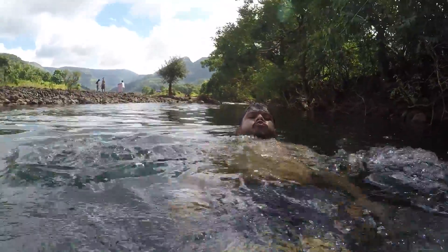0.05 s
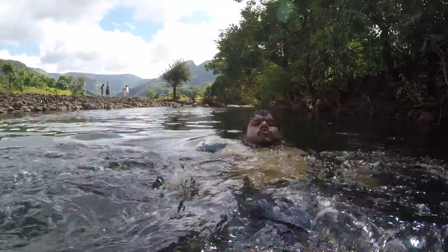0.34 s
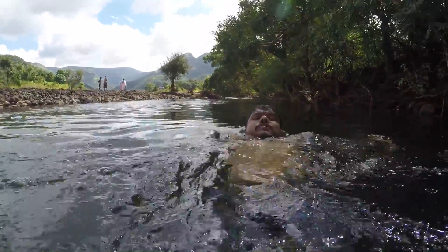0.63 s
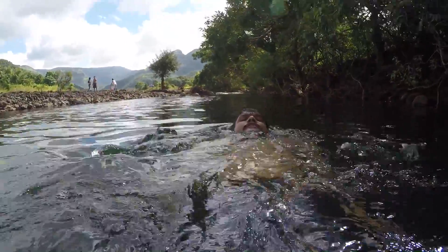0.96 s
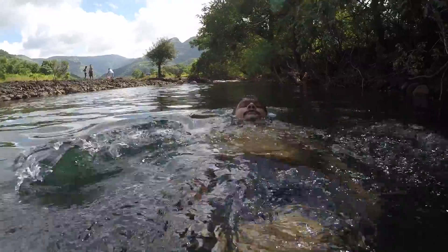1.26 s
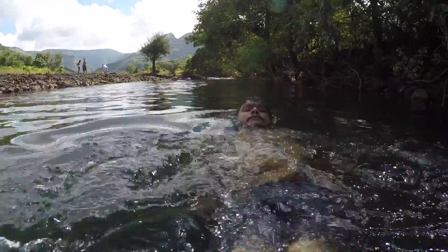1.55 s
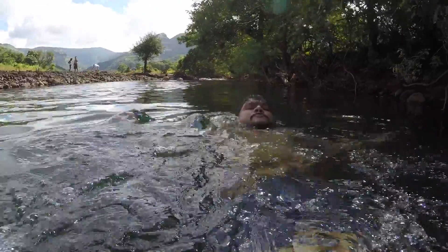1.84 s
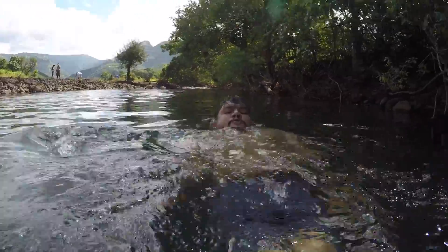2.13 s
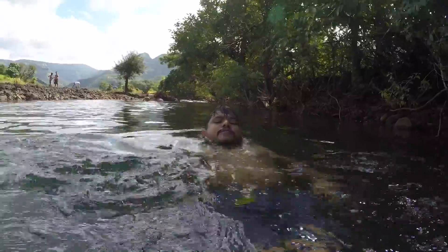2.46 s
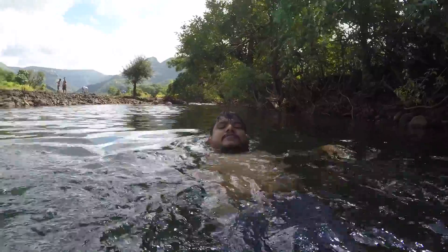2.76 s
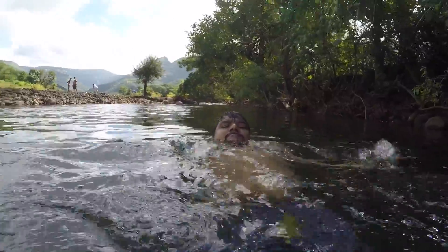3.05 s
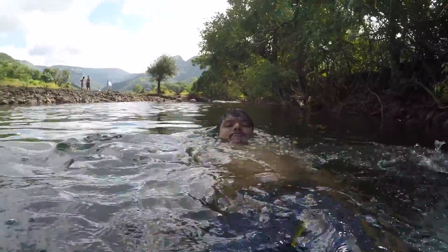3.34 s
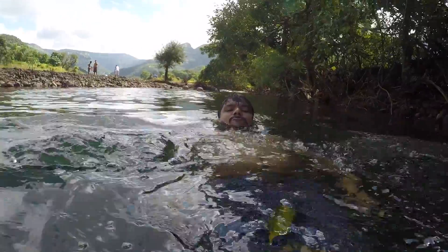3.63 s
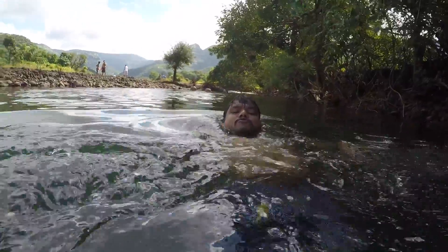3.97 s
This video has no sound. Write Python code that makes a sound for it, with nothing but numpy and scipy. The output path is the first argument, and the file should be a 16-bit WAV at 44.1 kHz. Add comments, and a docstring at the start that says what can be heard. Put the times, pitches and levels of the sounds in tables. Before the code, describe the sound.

Water splashes and sloshes as a swimmer paddles close by in a river.

```python
"""In a calm river, a swimmer paddles close to a camera whose waterproof case gives the splashes a boxy
ring near 2 kHz. Each stroke stirs up gurgling bubbles, pattering drops and fine spray. Slaps on the water
trap pockets of air that plop, and single drops land with a click and a chirp. Underneath, water trickles,
river and air hiss steadily, and wind on the microphone rumbles softly."""
import sys
import numpy as np
from scipy import signal
from scipy.fft import rfft, irfft, next_fast_len
from scipy.io import wavfile

SR = 44100
rng = np.random.default_rng(int(sys.argv[2]) if len(sys.argv) > 2 else 0)


def output_pcm(signal):
    """Save a mono or channel-first signal as 16-bit PCM at the path in sys.argv[1].

    Samples are clipped to [-1, 1] before scaling.
    """
    pcm = np.clip(np.atleast_2d(signal).T, -1, 1) * 32767
    wavfile.write(sys.argv[1], SR, np.round(pcm).astype(np.int16))


N = 176400

# How the waterproof case shapes the splashes. Each row: frequency in Hz, boost or cut in dB.
CASE_TONE = [(150, -24), (300, -8.5), (500, -8.5), (640, -5.5), (850, -4), (1170, -1.5), (1340, -12.5),
             (1570, -2.5), (1900, 1.5), (2240, 0.5), (2700, -4), (3400, -18.5), (4080, -13), (4500, -12),
             (4950, -14.5), (5450, -11.5), (5900, -21), (8200, -24), (9000, -27), (10500, -28.5),
             (12500, -30), (15000, -32.5)]


def undb(db):
    """Turn decibels into a number to multiply by."""
    return 10 ** (np.asarray(db) / 20)


def unit(x):
    """Scale a sound so that its average level (rms) is 1."""
    return x / np.sqrt(np.mean(x ** 2))


def peak(x):
    """Scale a sound so that its peak is 1."""
    return x / np.abs(x).max()


def add(out, start_s, x):
    """Mix the sound x into out, starting at a given time."""
    i = max(int(start_s * SR), 0)
    out[i:i + len(x)] += x[:max(len(out) - i, 0)]


def colour(x, points):
    """Shape the tone of a sound along a curve of (Hz, dB) points."""
    size = 2 * next_fast_len(len(x))
    hz, db = np.array(points, float).T
    bin_hz = np.arange(size // 2 + 1) * SR / size
    log_gain = np.log(undb(np.interp(np.log(bin_hz + 1), np.log(hz), db)))
    # Fold the filter so that it rings only after a sound, never before it.
    cepstrum = irfft(log_gain)
    cepstrum[1:size // 2] *= 2
    cepstrum[size // 2 + 1:] = 0
    return irfft(rfft(x, size) * np.exp(rfft(cepstrum)), size)[:len(x)]


def ring_time(decay_s):
    """Sample times in seconds, long enough for a ring to die away."""
    return np.arange(int(6 * decay_s * SR) + 64) / SR


def bubble(hz, decay_s, octaves_per_s):
    """A bubble rings and fades; its pitch climbs, by an octave at most, as it nears the surface."""
    t = ring_time(decay_s)
    pitch = hz * 2 ** np.minimum(octaves_per_s * t, 1)
    cycles = np.cumsum(pitch) / SR
    fade_in = 1 - np.exp(-cycles / 0.99)  # takes about one vibration
    return np.sin(2 * np.pi * cycles) * np.exp(-t / decay_s) * fade_in


def crack(decay_s):
    """Water hitting water makes a short burst of noise."""
    t = ring_time(decay_s)
    return rng.standard_normal(len(t)) * np.exp(-t / decay_s)


def swarm(low_hz, high_hz, per_s, cycles, rise, spread_db):
    """Many small bubbles of uneven size ring at random times, heard through the case."""
    out = np.zeros(N)
    swarm_rng = np.random.default_rng(rng.integers(2 ** 30))
    for when, pitch, softness, length in swarm_rng.random((int(per_s * N / SR), 4)):
        hz = low_hz + (high_hz - low_hz) * pitch
        decay_s = cycles * 2 ** (3 * length - 2) / hz  # a quarter to twice the given cycles
        db = -spread_db * np.log(.02 + .98 * softness)  # most are quiet, a few stand out
        ring = bubble(hz, decay_s, rise / decay_s)  # rise is in octaves per decay time
        add(out, when * N / SR, undb(db) * ring)
    return unit(colour(out, CASE_TONE))


def river_hiss():
    """River and air make a faint, steady hiss."""
    # The tone of the hiss. Each row: frequency in Hz, relative level in dB.
    tone = [(200, -1.5), (300, -3.5), (650, -7), (950, -4), (1380, -11.5), (1650, -1), (2300, -5.5),
            (3400, -15.5), (4000, -17), (5400, -15), (6200, -19.5), (10000, -23.5), (15000, -26.5)]
    return undb(-60) * unit(colour(rng.standard_normal(N), tone))


def wind_rumble():
    """Wind on the microphone makes a soft, uneven low rumble."""
    # The tone of the rumble. Each row: frequency in Hz, relative level in dB.
    tone = [(10, -25.5), (22, 3.5), (40, -1.5), (55, -4.5), (75, -11.5), (110, -14.5), (170, -20.5),
            (260, -27.5), (500, -38.5), (1500, -86)]
    # How the rumble swells and sinks, before a random wobble. Each row: time in seconds, level in dB.
    swells = [(0, -54), (.25, -53), (.39, -52.5), (.5, -48), (.7, -49.5), (.9, -51.5), (1.1, -48),
              (1.6, -49), (1.85, -44), (2.2, -49), (2.42, -43), (2.6, -50), (2.8, -43), (3.148, -51),
              (3.4, -42.5), (3.65, -45.5), (3.82, -40.5), (4, -46)]
    t = np.arange(N) / SR
    at, db = np.array(swells).T
    wobbles_per_s = 14
    wobble_db = 1.5 * np.interp(t * wobbles_per_s, np.arange(256), rng.uniform(-1, 1, 256))
    rumble = unit(colour(rng.standard_normal(N), tone))
    return rumble * undb(np.interp(t, at, db) + wobble_db)


def trickle():
    """Ripples and stray droplets keep trickling and ticking, even between strokes."""
    ripples = swarm(low_hz=1350, high_hz=3270, per_s=140, cycles=3, rise=0.035, spread_db=3.5)
    ticks = swarm(low_hz=3220, high_hz=9000, per_s=140, cycles=7.8, rise=0.02, spread_db=1)
    return undb(-64.5) * ripples + undb(-76.5) * ticks


def spray_flicks():
    """Fine spray lands next to the case in bright ticks, each strongest around its own pitch."""
    # The ticks. Each row: start in seconds, peak level in dB, pitch in Hz, decay time in seconds.
    flicks = [(.128, -42, 5000, 0.0037), (0.146, -39, 4090, .003), (0.345, -38.5, 5310, 0.0015),
              (.5, -39.5, 5400, 0.0014), (0.538, -45, 7600, 0.0014), (0.584, -49, 7500, .0015),
              (.664, -37.5, 5540, .004), (.673, -35.5, 7450, 0.0023), (.705, -33.5, 4000, 0.0062),
              (0.714, -34, 5830, 0.0031), (.738, -44, 7000, 0.0019), (1.297, -34, 4800, 0.0032),
              (1.34, -39.5, 4300, 0.0099), (1.546, -42, 4520, 0.0029), (1.566, -42, 3730, 0.0045),
              (1.812, -41, 8600, .002), (1.966, -50, 7600, 0.0027), (1.977, -43, 4630, 0.013),
              (2.024, -45, 4080, 0.0022), (2.153, -45, 4110, .002), (2.435, -47, 4700, .003),
              (2.553, -45, 3700, .003), (2.786, -44.5, 3000, .002), (2.817, -41.5, 2930, 0.0034),
              (2.818, -40.5, 11600, 0.0014), (3.07, -46, 5150, .003), (3.587, -44.5, 4100, 0.0062),
              (3.775, -37.5, 4800, 0.0027)]
    width = 2 ** 0.41  # 0.41 octaves to either side
    out = np.zeros(N)
    for at, db, hz, decay_s in flicks:
        tone = [(hz / 4, -26), (hz / width, -11), (hz, 0), (hz * width, -10)]
        tick = colour(crack(decay_s), tone)
        add(out, at, undb(db) * peak(colour(tick, CASE_TONE)))
    return out


def falling_drops():
    """Each drop clicks on the surface and leaves a small chirping bubble."""
    # The drops. Each row: start in seconds, peak level in dB, starting pitch in Hz, decay in seconds.
    drops = [(.139, -34, 2200, 0.002), (0.143, -33.5, 2530, .0015), (0.199, -29, 2206, 0.0036),
             (.54, -36.5, 2600, 0.0049), (0.609, -35.5, 1880, 0.0044), (0.644, -40, 2320, 0.0028),
             (.661, -35.5, 2450, 0.0055), (.674, -29.5, 2000, 0.0011), (.689, -36.5, 1790, 0.0049),
             (.737, -34.5, 1900, 0.0037), (1.091, -40.5, 1810, 0.0025), (1.146, -35, 2360, 0.0017),
             (1.189, -36.5, 2400, 0.0023), (1.227, -36.5, 2200, 0.0025), (1.338, -36, 2740, 0.0039),
             (1.393, -25.5, 2185, 0.0034), (1.428, -35.5, 1880, 0.0054), (1.489, -35, 2300, 0.0045),
             (1.567, -38.5, 1890, 0.0012), (1.839, -35, 1850, 0.0036), (1.848, -38.5, 2350, 0.0043),
             (1.881, -36, 1640, 0.0029), (1.97, -35, 2250, 0.0044), (2.044, -36.5, 2330, 0.0046),
             (2.141, -38.5, 1810, 0.0061), (2.201, -31, 2630, 0.00068), (2.306, -39.5, 1970, 0.0021),
             (2.482, -36, 1650, .002), (2.512, -42.5, 1494, 0.0081), (2.552, -38.5, 1680, 0.0025),
             (2.763, -43, 1770, 0.0021), (2.787, -48, 1870, 0.0014), (2.818, -40.5, 1900, 0.003),
             (3.074, -36, 2080, 0.0011), (3.202, -37.5, 2200, 0.0017), (3.584, -38, 2230, 0.0067),
             (3.858, -35.5, 2310, 0.00095), (3.917, -44.5, 1610, 0.0062)]
    out = np.zeros(N)
    for at, db, hz, decay_s in drops:
        chirp = peak(colour(bubble(hz, decay_s, octaves_per_s=18.4), CASE_TONE))
        click = peak(colour(crack(decay_s=0.0021), CASE_TONE))
        drop = np.zeros(SR // 10)
        add(drop, 0, chirp)
        add(drop, 0, 0.27 * click)
        add(out, at, undb(db) * peak(drop))
    return out


def air_plops():
    """A hand or foot slaps the surface and traps a pocket of air that rings with a rising pitch."""
    # The air pockets. Each row: start in seconds, peak level of the ring in dB, starting pitch in Hz,
    # decay time in seconds, pitch rise in octaves per second, strength of the slap relative to the ring.
    pockets = [(.395, -39.5, 766, 0.0034, 4, 1), (.397, -64, 420, 0.016, 3.2, .2),
               (.688, -36.5, 1034, 0.011, 11, 0.47), (1.076, -49, 620, 0.017, 6.7, 0.18),
               (1.302, -42, 1080, 0.0078, 9.1, .2), (1.428, -40, 740, 0.0036, 8, 0.7),
               (1.603, -44.5, 887, 0.014, 2.4, .2), (1.8, -51, 1164, 0.018, 3.5, .1),
               (1.84, -39, 621, 0.013, 7.8, 1), (1.878, -46, 695, .026, 28, .05),
               (1.963, -40, 900, 0.0081, 4, .1), (1.98, -46, 604, 0.013, 5.5, .4),
               (2.37, -51.5, 790, 0.022, 15, .1), (2.685, -53.5, 866, 0.024, 5.1, .05),
               (2.82, -52.5, 947, 0.017, 13, 0.13), (3.262, -48, 1010, 0.0071, 7.5, .1)]
    out = np.zeros(N)
    for at, db, hz, decay_s, octaves_per_s, slap_strength in pockets:
        ring = peak(colour(bubble(hz, decay_s, octaves_per_s), CASE_TONE))
        slap = peak(colour(crack(decay_s=0.0079), CASE_TONE))
        add(out, at, undb(db) * ring)
        add(out, at, undb(db) * slap_strength * slap)
    return out


def churn(level, band_hz, wash, per_s, cycles, rise, spread_db):
    """Churned water bubbles at a given level; the harder the stroke, the more it blurs into a wash."""
    bubbles = swarm(*band_hz, per_s, cycles, rise, spread_db)
    band = signal.butter(4, band_hz, "band", fs=SR, output="sos")
    noise = signal.sosfilt(band, rng.standard_normal(N))
    blur = unit(colour(noise, CASE_TONE))
    share = wash * (level / level.max()) ** 0.58
    return level * (bubbles + share * blur) / np.hypot(1, share)  # the blur adds no extra power


def swimming_strokes():
    """Each stroke swells and drains away, stirring up large, middling and tiny bubbles and a fizz."""
    # The strokes of arms and legs. Each row: time of the peak, rise time and fall time in seconds,
    # then the levels of gurgle, patter and spray in dB.
    strokes = [(.02, 0.046, 0.15, -51, -46.5, -57.5), (.125, 0.036, 0.13, -58.5, -47, -63.5),
               (.31, 0.063, 0.075, -63.5, -53, -64), (.41, 0.044, 0.074, -52.5, -57, -63),
               (0.474, 0.048, 0.088, -71, -49, -61), (.67, 0.036, 0.039, -83, -52.5, -58.5),
               (0.747, 0.034, .025, -68, -46, -64.5), (1.09, 0.06, 0.42, -60, -56, -65),
               (1.34, .09, 0.24, -55, -48, -63), (1.441, 0.034, 0.092, -57, -44.5, -58.5),
               (1.59, 0.042, 0.1, -58.5, -48, -60), (1.791, 0.1, 0.21, -55.5, -54.5, -62),
               (1.976, 0.017, 0.06, -46, -45, -56), (2.04, 0.066, 0.095, -66, -48, -60.5),
               (2.32, 0.081, 0.6, -61.5, -57.5, -69), (2.51, 0.019, 0.056, -65, -55, -67),
               (3.075, 0.031, 0.13, -53, -49, -66.5), (3.115, 0.052, .04, -53, -71, -82),
               (3.35, 0.11, 0.15, -61, -54, -66.5), (3.539, 0.063, 0.11, -58, -55, -67),
               (3.96, 0.062, 0.17, -65.5, -57.5, -71)]
    t = np.arange(N) / SR
    power = np.zeros((3, N))
    for at, rise_s, fall_s, *levels_db in strokes:
        swell = np.exp(-np.where(t < at, ((t - at) / rise_s) ** 2, (t - at) / fall_s))
        power += (undb(levels_db)[:, None] * swell) ** 2
    gurgle, patter, spray = np.sqrt(power)
    fizz = spray * undb(-7)  # the finest droplets follow the spray
    return (churn(gurgle, (300, 1353), wash=0.67, per_s=340, cycles=3.56, rise=0.06, spread_db=3)
            + churn(patter, (1424, 3182), wash=0.86, per_s=750, cycles=4.2, rise=0.044, spread_db=5)
            + churn(spray, (3216, 6070), wash=0.88, per_s=580, cycles=4.7, rise=0.023, spread_db=5)
            + churn(fizz, (5990, 14500), wash=1, per_s=760, cycles=6.9, rise=0.017, spread_db=6))


def scene():
    """Mix the water sounds over the background, in one channel."""
    background = wind_rumble() + river_hiss()
    water = swimming_strokes() + trickle() + air_plops() + falling_drops() + spray_flicks()
    return (background + water)[None]


def record(dry):
    """The camera cuts off the very highest treble."""
    top_hz = 15450
    return signal.sosfilt(signal.ellip(10, .2, 70, top_hz, fs=SR, output="sos"), dry)


dry = scene()
out = record(dry)
output_pcm(out)
```